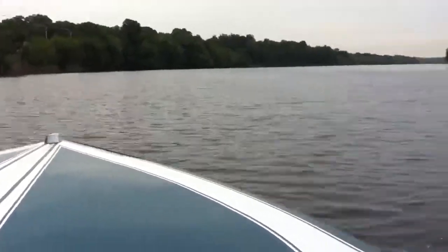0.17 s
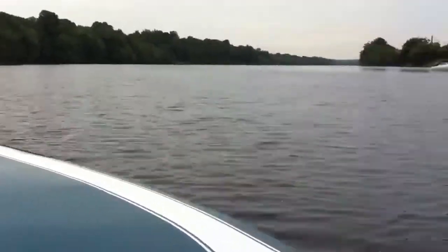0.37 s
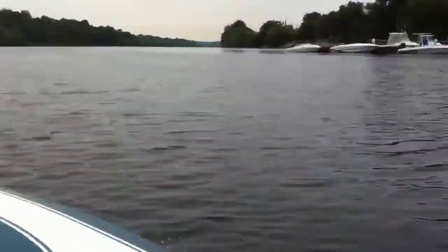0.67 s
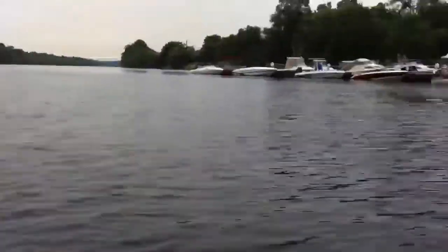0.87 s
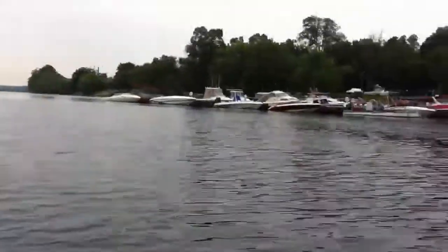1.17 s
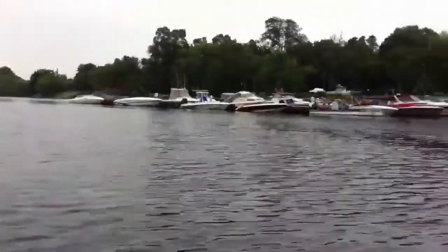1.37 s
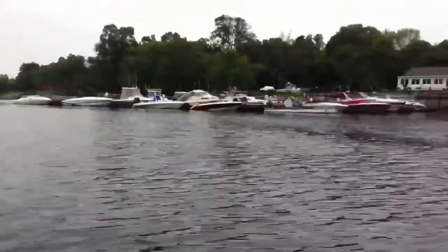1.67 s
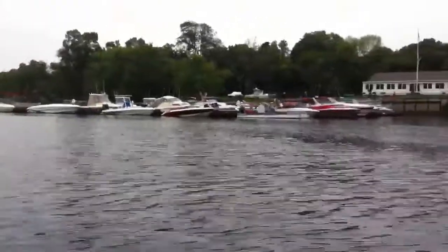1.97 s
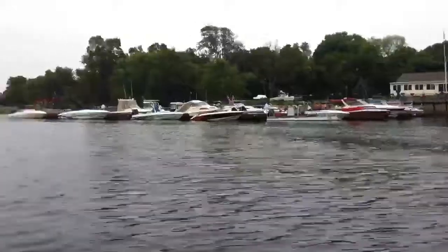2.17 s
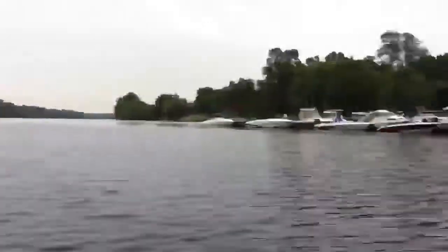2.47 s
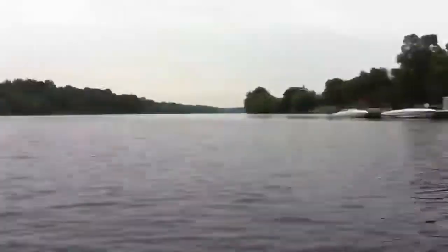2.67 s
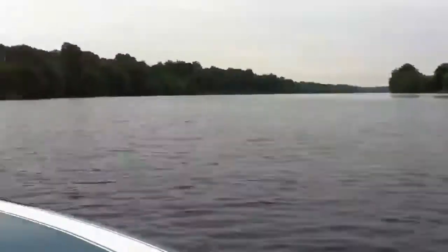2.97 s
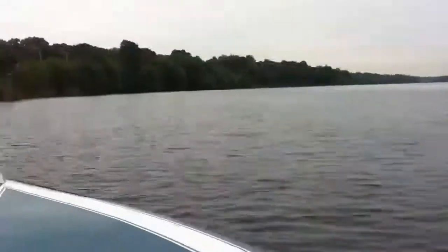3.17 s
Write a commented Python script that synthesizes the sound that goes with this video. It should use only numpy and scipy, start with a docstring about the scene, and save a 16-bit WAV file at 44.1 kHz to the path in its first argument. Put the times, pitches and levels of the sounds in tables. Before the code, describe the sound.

A motorboat engine rumbles from the cockpit over steady hull wash, fine fizz and droplets. At about 0.45 seconds the throttle eases; its pitch sinks and settles by about 1 second into a low, throbbing drone. A soft thump at 0.6 precedes a tiny close tick at 0.8. Dull wind gusts buffet the microphone from 1.2 to 2.8, strongest after 2, while spray swells gently around 2. Two ticks follow near 3.1.

```python
"""On board a motorboat on a wide river, heard from the cockpit: an eight-cylinder engine runs over the wash,
fizz and droplets along the hull. About half a second in, the throttle is eased and the engine settles into
a throbbing drone: multiples of its cycle rate and pulsing noise. After a soft thump, a tiny tick (a ping
and a snap) sounds close by; then gusts of dull noise buffet the microphone, with eddies thumping it,
while spray swells once. Two more ticks come near the end."""
import sys
import numpy as np
from scipy import signal
from scipy.fft import rfft, irfft, next_fast_len
from scipy.io import wavfile
from scipy.ndimage import uniform_filter1d, map_coordinates

SR = 44100
rng = np.random.default_rng(int(sys.argv[2]) if len(sys.argv) > 2 else 0)


def file_out(sig):
    """Save sig as 16-bit WAV at sys.argv[1]."""
    # one column per channel
    cols = np.atleast_2d(sig).T
    # limit, then scale
    lim = np.clip(cols, -1, 1)
    pcm = np.round(lim * 32767).astype(np.int16)
    wavfile.write(sys.argv[1], SR, pcm)


N = 146853

# engine: the throttle is eased
THROTTLE_S, THROTTLE_TAKES_S = 0.44, 0.19  # start and duration
CYLINDERS = 8  # each fires once a four-stroke cycle
DRONE_MULTIPLE = 16  # the drone lies at twice the firing rate
DRONE_OPEN_DB, DRONE_EASED_DB = -35, -26.2  # before the exhaust resonances
THROB_S, LOPE_S = 2.961, 3.0  # moments at which the beat and the slower swell are at their top
UPPER_DB, UPPER_DB_PER_OCT = -54, -3  # the weak higher multiples, from the 25th up
WAVER_DB, WAVER_RATE = 0.75, 4.61  # wavering of the rumble: spread, random knots a second
JITTER_RAD, JITTER_RATE = 0.023, 16  # uneven firing: radians of the cycle, random knots a second
EXHAUST_DB, EXHAUST_PULSING = -31, 0.57  # breathy noise: level, depth of its pulsing

# water along the hull
WASH_FLUTTER_DB, FIZZ_FLUTTER_DB = 0.15, 0.83
SPRAY_S, SPRAY_WIDTH_S, SPRAY_DB = 2.04, 0.81, -45  # one swell: top, half width at 1/e, level at the top
DROPS_PER_S, DROP_DB = 500, -47
DROP_HZ, DROP_SPREAD = 2270, 0.664  # median pitch, spread of its natural logarithm
DROP_CYCLES = 6.5  # a drop falls 30 dB in this many cycles
DROP_SCATTER_DB = 2  # scale of the exponential scatter in level

# wind and contact at the microphone
BREEZE_DB = -25  # before its changing share
LUMP_DB, LUMP_RATE = 2.7, 60  # turbulence: spread, random knots a second
THUMP_ATTACK_S, PUFF_DB = 0.00053, -8.5  # the puff is relative to the push
TICK_HZ, TICK_T60_S = 11300, 0.00095  # the ping
SNAP_T60_S, SNAP_DB = 0.0056, -2  # the snap, relative to the ping

# microphone band
TOP_HZ = 15900
LOW_CUT_HZ, LOW_CUT_STEEPNESS, LOW_FLOOR_DB = 76, 5, -20.5  # bass roll-off, and where it levels out


def amp(db):
    """Decibels to gain."""
    return 10 ** (np.asarray(db) / 20)


def unit(x):
    """Scaled to rms 1."""
    return x / np.sqrt(np.mean(x ** 2) + 1e-20)


def curve(rows):
    """(time [s], value) points as one value per sample."""
    return np.interp(np.arange(N) / SR, *np.transpose(rows))


def wobble(rate):
    """A smooth random curve, rate knots a second."""
    return map_coordinates(rng.standard_normal(1024), [np.arange(N) * rate / SR], mode="wrap")


def filtered(x, response):
    """x with its spectrum multiplied by a response of frequency."""
    m = next_fast_len(N + SR // 2)  # padding keeps the end from wrapping to the start
    return irfft(rfft(x, m) * response(np.fft.rfftfreq(m, 1 / SR)), m)[:N]


def rush(spectrum, patchy_db):
    """Coloured noise of rms 1, with patches of random gain in time and frequency."""
    z = signal.stft(rng.standard_normal(N), nperseg=512)[2]
    field = uniform_filter1d(rng.standard_normal(z.shape), size=6, axis=0)
    field = uniform_filter1d(field, size=10, axis=1)
    noise = signal.istft(z * amp(patchy_db * unit(field)), nperseg=512)[1][:N]
    f, db = np.transpose(spectrum)
    return unit(filtered(noise, lambda hz: amp(np.interp(np.log(hz + 1), np.log(f + 1), db))))


def fade(s, t60):
    """An envelope that starts at s and falls 60 dB in t60 seconds."""
    t = np.arange(N) / SR - s
    return (t >= 0) * np.exp(-np.log(1000) * np.abs(t) / t60)


def ring(s, hz, t60):
    """A damped sine that starts at s."""
    return np.sin(2 * np.pi * hz * (np.arange(N) / SR - s)) * fade(s, t60)


def engine():
    """Multiples of the cycle rate, rebalanced as the throttle closes, and exhaust noise pulsing at each firing."""
    # engine speed: (time [s], four-stroke cycle rate [Hz])
    speed_points = [(0.0, 14.358), (0.38, 14.448), (0.5, 14.014), (0.62, 12.989), (0.74, 12.546),
                    (0.87, 12.076), (1.05, 11.832), (1.3, 11.755), (1.6, 11.703), (1.95, 11.739),
                    (2.3, 11.87), (2.9, 11.868), (3.33, 11.991)]
    # depth of the drone's once-a-cycle beat, as the engine settles: (time [s], share)
    throb_depth = [(.45, 0.076), (.75, 0.39), (1.3, 0.45), (2.9, 0.57)]
    # at low speed every other cycle grows stronger: (time [s], depth)
    lope_depth = [(.7, 0), (1.8, .17), (2.9, .3)]
    # rumble of uneven cylinders: (multiple of cycle rate, level throttle open [dB], level eased [dB])
    rumble_rows = [(7, -33.5, -46), (8, -29, -32), (9, -47, -48), (10, -33, -47), (11, -29.5, -37.5),
                   (12, -33.5, -36.5), (13, -41, -34), (14, -38.5, -38.5), (15, -42, -46), (18, -31, -38),
                   (20, -33, -62), (21, -41, -40), (22, -45, -36.5), (24, -36, -48), (26, -46, -44),
                   (29, -53, -58), (34, -44.5, -45), (36, -48, -38)]
    # exhaust resonances the multiples slide through: (frequency [Hz], half width at 1/e [Hz], boost [dB])
    pipe_rows = [(191.3, 25, 10), (232.5, 13.5, 11.5), (318, 9.5, 13)]
    # colour of the breathy exhaust: (frequency [Hz], relative level [dB per Hz])
    exhaust_colour = [(25, -44), (45, -50), (70, -51), (92, -7.5), (130, -17), (200, -7.5), (300, -7.5),
                      (420, -14.5), (600, -25), (1200, -26), (4000, -94)]

    t, speed = np.arange(N) / SR, curve(speed_points)
    angle = 2 * np.pi * np.cumsum(speed) / SR
    since = lambda s: angle - np.interp(s, t, angle)
    eased = np.clip((t - THROTTLE_S) / THROTTLE_TAKES_S, 0, 1)

    def gain(k, open_db, eased_db):
        """Level of multiple k, with the exhaust resonances at its moving frequency."""
        pipe_db = sum(db * np.exp(-((k * speed - hz) / width) ** 2) for hz, width, db in pipe_rows)
        return amp(open_db + (eased_db - open_db) * eased + pipe_db)

    # the next multiple beats with the drone once a cycle
    beating = np.cos(DRONE_MULTIPLE * since(THROB_S))
    beating = beating + curve(throb_depth) * np.cos((DRONE_MULTIPLE + 1) * since(THROB_S))
    lope = 1 + curve(lope_depth) * np.cos(since(LOPE_S) / 2)
    drone = gain(DRONE_MULTIPLE, DRONE_OPEN_DB, DRONE_EASED_DB) * beating * lope

    # the same jitter smears high multiples more than low ones
    uneven = angle + JITTER_RAD * wobble(JITTER_RATE)
    partial = lambda k: np.cos(k * uneven + 2 * np.pi * rng.random())
    waver = lambda: amp(WAVER_DB * wobble(WAVER_RATE))
    rumble = sum(gain(round(k), *levels) * partial(round(k)) * waver() for k, *levels in rumble_rows)
    multiples = np.arange(25, 80)
    upper_db = UPPER_DB + UPPER_DB_PER_OCT * np.log2(multiples / multiples[0])
    upper = sum(amp(db) * partial(k) for k, db in zip(multiples, upper_db))

    firing = unit(1 + EXHAUST_PULSING * np.cos(CYLINDERS * angle))
    exhaust = amp(EXHAUST_DB) * firing * rush(exhaust_colour, patchy_db=2.5)
    return drone + rumble + upper + exhaust


def droplets():
    """Many small bubbles and drops, each ringing for a few cycles; rms 1."""
    t = np.arange(SR // 50) / SR
    count = int(DROPS_PER_S * N / SR)
    start = rng.integers(0, N, count)
    hz = np.minimum(DROP_HZ * np.exp(DROP_SPREAD * rng.standard_normal((count, 1))), TOP_HZ)
    size = amp(DROP_SCATTER_DB * np.minimum(rng.exponential(size=(count, 1)), 3))
    decay = np.exp(-np.log(1000) * hz * t / (2 * DROP_CYCLES))
    rings = size * np.sin(2 * np.pi * hz * t) * decay
    places = start[:, None] + np.arange(len(t))
    return unit(np.bincount(places.ravel(), rings.ravel(), N)[:N])


def water():
    """Noise for the wash along the hull, its fizzing foam and a swell of spray, with ringing droplets."""
    # colour of the wash: (frequency [Hz], relative level [dB per Hz])
    wash_colour = [(100, 5.5), (350, -3.5), (600, 4.5), (740, 1.5), (950, 2.5), (1350, -2.5), (2000, -4.5),
                   (2700, -9), (3400, -14.5), (5000, -18.5), (7000, -23), (16000, -27)]
    # wash before its flutter: (time [s], level [dB])
    wash_level = [(0, -32.5), (.9, -32.5), (1.5, -33), (2.2, -32.5), (2.8, -33), (3.33, -32.5)]
    # colour of the foam: (frequency [Hz], relative level [dB per Hz])
    fizz_colour = [(1500, -1), (4000, 3.5), (5500, 3.5), (7000, -4.5), (8300, 3), (9500, -3.5),
                   (12000, 2.5), (14000, -5), (15800, -17)]
    # foam before its flutter: (time [s], level [dB])
    fizz_level = [(0, -54), (.7, -50.5), (1.1, -52), (2.15, -48), (2.6, -54), (2.95, -58), (3.33, -53)]
    # hiss of the bow wave: (frequency [Hz], relative level [dB per Hz])
    spray_colour = [(1200, -51), (2600, 11), (4300, 0), (5600, -3), (7000, -19), (12000, -26)]

    wash = amp(curve(wash_level) + WASH_FLUTTER_DB * wobble(rate=14)) * rush(wash_colour, patchy_db=1.3)
    fizz = amp(curve(fizz_level) + FIZZ_FLUTTER_DB * wobble(rate=34)) * rush(fizz_colour, patchy_db=2.9)
    swell = np.exp(-((np.arange(N) / SR - SPRAY_S) / SPRAY_WIDTH_S) ** 2)
    spray = amp(SPRAY_DB) * swell * rush(spray_colour, patchy_db=2.5)
    return wash + fizz + spray + amp(DROP_DB) * droplets()


def wind():
    """A dull steady wind and short gusts, each with its own pitch, in turbulent lumps at the microphone."""
    # gusts: (time of top [s], standard deviation [s], level [dB], pitch ratio of the buffeting)
    gust_rows = [(1.168, 0.029, -31, .95), (1.255, 0.016, -27, 0.79), (1.39, .06, -25.5, 1.07),
                 (1.61, 0.037, -21, 1.05), (1.78, 0.034, -24.5, 1.1), (1.99, .028, -18.5, 1.09),
                 (2.065, 0.035, -17, 0.9), (2.525, 0.03, -15, 1.05), (2.675, .025, -17.5, 0.99)]
    # colour of the buffeting at pitch ratio 1: (frequency [Hz], relative level [dB per Hz])
    buffet_colour = [(25, -45), (55, -48), (90, -26), (150, -1), (250, 0.5), (400, -10.5), (700, -28.5),
                     (1500, -66), (5000, -75)]
    # steady wind under the gusts, rising and falling: (time [s], share)
    breeze_share = [(.9, .15), (1.15, 1.33), (1.7, 0.9), (2.3, 0.91), (2.65, 1.75), (2.9, 0.43)]
    # duller colour of the breeze: (frequency [Hz], relative level [dB per Hz])
    breeze_colour = [(25, -38), (60, -34), (90, -26), (130, -3), (180, -2), (280, -9), (500, -18.5),
                     (2000, -61)]

    t = np.arange(N) / SR
    lumps = amp(LUMP_DB * wobble(LUMP_RATE))

    def buffet(pitch):
        """Lumpy noise of rms 1, its colour shifted by the pitch ratio."""
        return unit(lumps * rush([(hz * pitch, db) for hz, db in buffet_colour], patchy_db=1.5))

    bell = lambda s, width: np.exp(-((t - s) / width) ** 2 / 2)
    gusts = sum(amp(db) * bell(s, width) * buffet(pitch) for s, width, db, pitch in gust_rows)
    breeze = amp(BREEZE_DB) * curve(breeze_share)
    return gusts + breeze * unit(lumps * rush(breeze_colour, patchy_db=2.5))


def thumps():
    """Single eddies hit the microphone: a low damped push and a puff of noise."""
    # eddies: (time [s], level [dB], pitch [Hz], 60 dB decay [s])
    thump_rows = [(.626, -19, 240, 0.039), (1.171, -12.5, 300, 0.031), (1.986, -8, 354, 0.026),
                  (2.514, -11.5, 450, 0.04), (2.599, -12, 348, 0.035), (2.639, -19, 240, 0.04),
                  (2.665, -14.5, 316, .07), (2.81, -7.5, 378, 0.014)]
    # colour of the puff: (frequency [Hz], relative level [dB per Hz])
    puff_colour = [(200, -5), (500, 11), (900, -11), (2000, -15), (6000, -51), (12000, -75)]

    puff = amp(PUFF_DB) * rush(puff_colour, patchy_db=0.5)
    rise = lambda s: np.clip((np.arange(N) / SR - s) / THUMP_ATTACK_S, 0, 1)
    hit = lambda s, hz, t60: rise(s) * (ring(s, hz, t60) + puff * fade(s, t60))
    return sum(amp(db) * hit(s, hz, t60) for s, db, hz, t60 in thump_rows)


def ticks():
    """Each tick close by is a very short bright ping over a duller snap of noise."""
    # ticks: (time [s], level [dB])
    tick_rows = [(0.8229, -22.5), (3.0637, -15.5), (3.14, -27)]
    # colour of the snap: (frequency [Hz], relative level [dB per Hz])
    snap_colour = [(600, -2), (1800, 5), (3500, -7.5), (8000, -13), (16000, -16)]

    snap = amp(SNAP_DB) * rush(snap_colour, patchy_db=3.5)
    tick = lambda s: ring(s, TICK_HZ, TICK_T60_S) + snap * fade(s, SNAP_T60_S)
    return sum(amp(db) * tick(s) for s, db in tick_rows)


def scene():
    """Everything as heard from the cockpit, in mono."""
    return (engine() + water() + wind() + thumps() + ticks())[None]


def record(dry):
    """The microphone rolls off the deep bass down to a floor and keeps nothing above its band limit."""
    def response(hz):
        """Gain of the microphone at each frequency."""
        roll_off = 1 / np.sqrt(1 + (LOW_CUT_HZ / (hz + 1)) ** (2 * LOW_CUT_STEEPNESS))
        return (hz < TOP_HZ) * np.maximum(roll_off, amp(LOW_FLOOR_DB))

    return filtered(dry[0], response)[None]


dry = scene()
out = record(dry)
file_out(out)
```